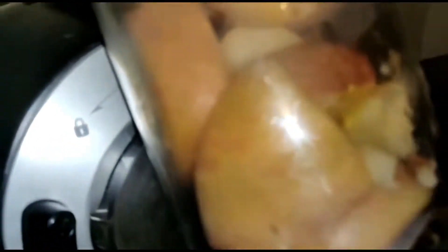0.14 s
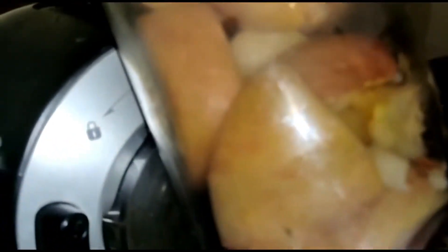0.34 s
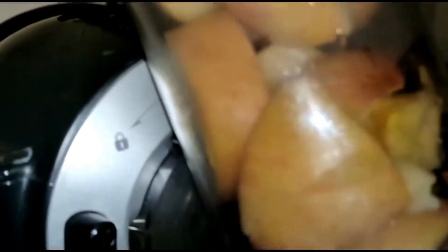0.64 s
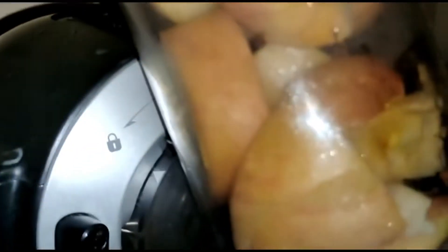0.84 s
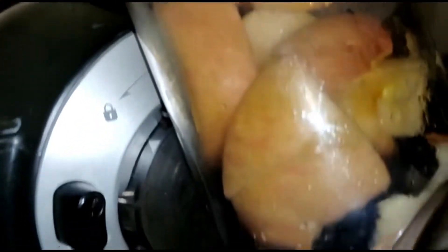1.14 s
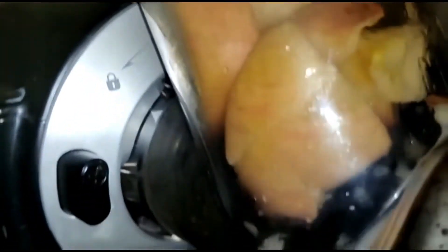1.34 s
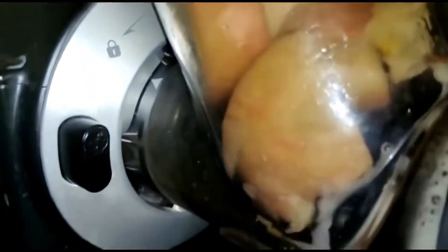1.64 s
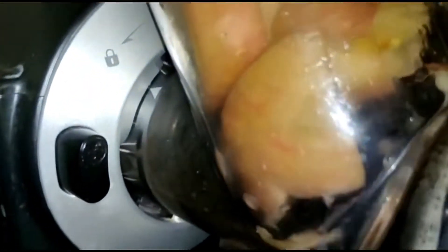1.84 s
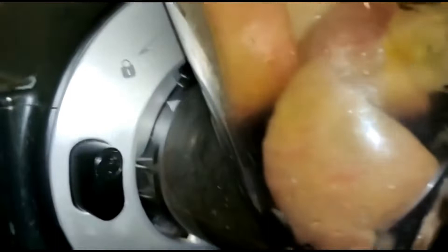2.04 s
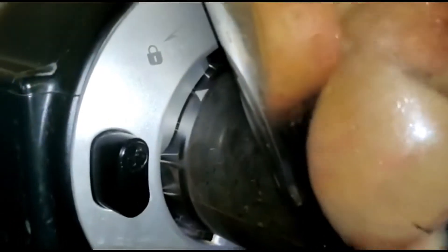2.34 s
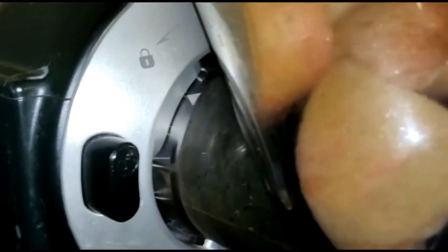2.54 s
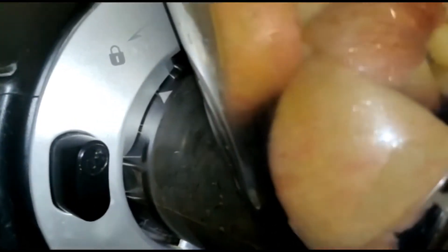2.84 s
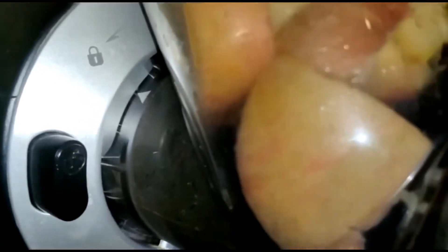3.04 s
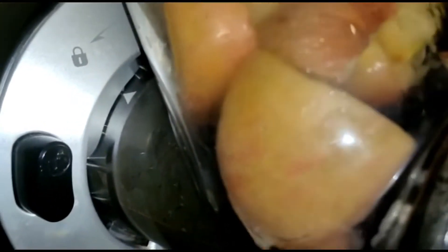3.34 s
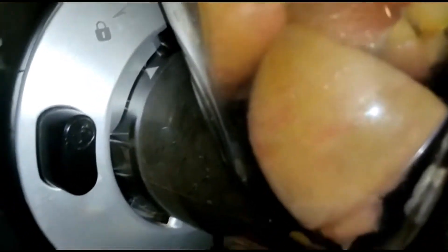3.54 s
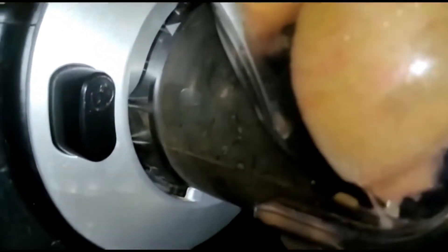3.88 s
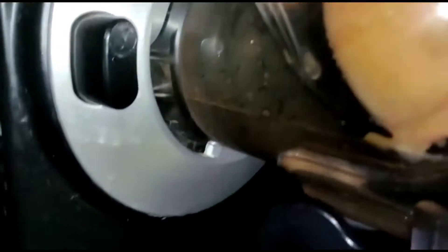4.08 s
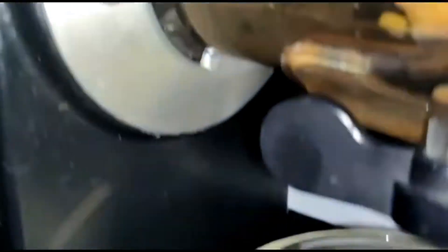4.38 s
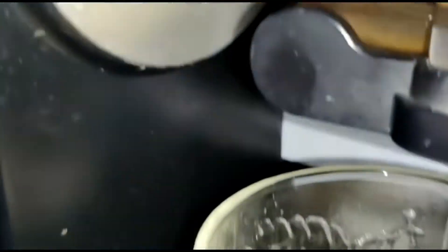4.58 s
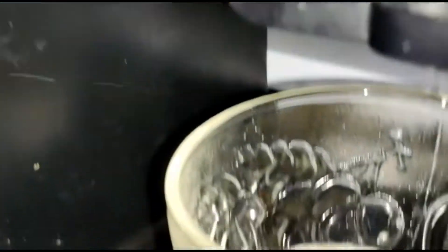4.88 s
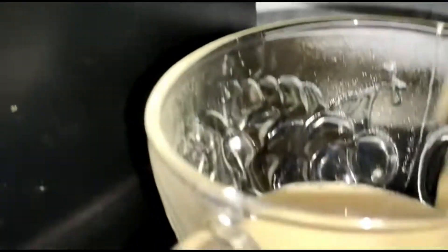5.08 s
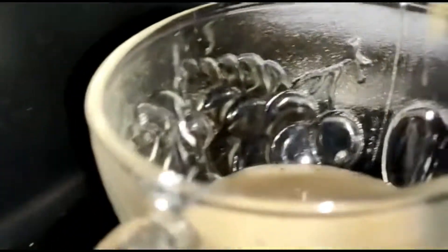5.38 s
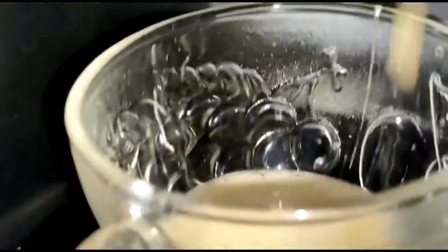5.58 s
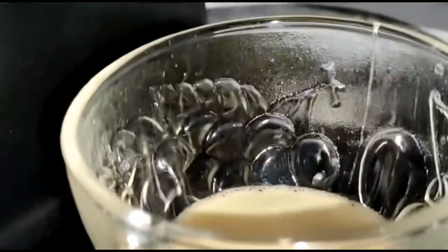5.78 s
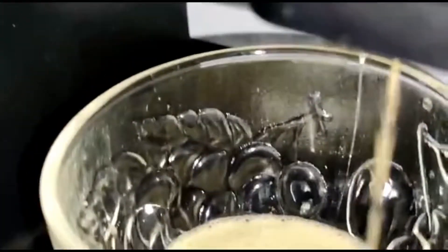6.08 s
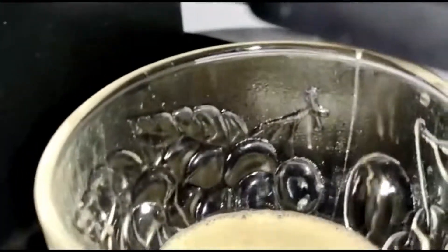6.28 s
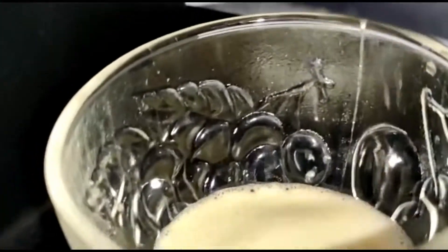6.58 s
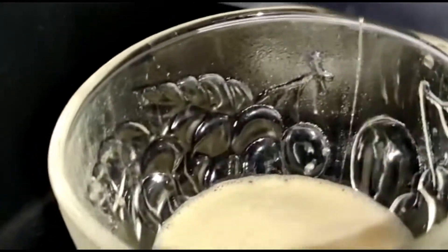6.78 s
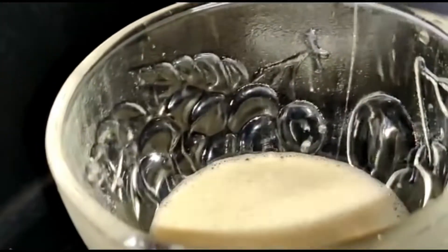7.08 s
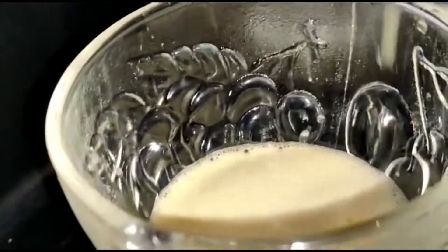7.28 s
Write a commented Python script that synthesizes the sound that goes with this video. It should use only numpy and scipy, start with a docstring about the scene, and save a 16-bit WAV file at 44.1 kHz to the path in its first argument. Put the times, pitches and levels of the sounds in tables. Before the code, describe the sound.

A juicer's electric motor drones with a buzzy hum and noisy gear whirr. First come small knocks and a crisp apple crack, then a low juddering groan with tearing crunch. From two seconds a high, raspy squeak returns once per auger turn, evenly spaced, over a slightly quickening motor. Pulp spits and chirps near the end. Heard very close in stereo by a phone in a kitchen, with short reflections.

```python
"""The turning auger of a slow juicer squeaks on wet pulp about every 0.6 s: friction sounds a gliding set of partials.
Before that an apple piece cracks and another jams, dragged along the wall with a loud groaning crunch (stick-slip).
Behind it the motor, fed with rectified mains, hums and throbs under load and speeds up as the fruit gives way.
Pulp crackles and whistles in the strainer; a hand-held phone hears it all close by on a kitchen counter."""
import sys
import numpy as np
from scipy import signal
from scipy.fft import rfft, irfft
from scipy.io import wavfile
from scipy.ndimage import uniform_filter1d

SR = 44100
rng = np.random.default_rng(int(sys.argv[2]) if len(sys.argv) > 2 else 0)


def unload_wav(signal):
    """Save mono or channel-first audio to the path in sys.argv[1] as 16-bit WAV at rate SR, clipped to [-1, 1]."""
    wavfile.write(
        sys.argv[1],
        SR,
        np.round(np.clip(np.atleast_2d(signal).T, -1, 1) * 32767).astype(np.int16),
    )


N = 327222
T = np.arange(N) / SR
FREQS = np.fft.rfftfreq(N, 1 / SR)

# Levels are those of the sources, ahead of room and microphone.
# motor speed, low under load: [t/s, shaft rate f/Hz]
SHAFT_SPEED = [(0.0, 64.1), (0.25, 64.3), (0.29, 63.4), (0.78, 63.5), (0.99, 65.4), (1.24, 65.9),
               (1.42, 62.5), (1.64, 62.1), (1.75, 65.9), (2.4, 67.6), (2.67, 67.4), (3.45, 69.5),
               (3.64, 70.9), (4.21, 72.0), (5.08, 71.5), (5.39, 72.7), (6.26, 72.5), (7.42, 73.8)]
# shaft rates when labouring, running easily and running free [f/Hz]
LOAD_SPEEDS = [65, 71.7, 72.9]
# motor and gear tones: [multiple of shaft rate, multiple of mains ripple, level/dB labouring, easy, free]
MOTOR_TONES = [(3, 0, -66, -59.5, -56.5), (5, 0, -45, -51.5, -58), (6, 0, -67, -82, -86),
               (7, 0, -51.5, -50.5, -47.5), (8, 0, -92, -45, -39), (9, 0, -46, -48.5, -48),
               (13, 0, -55, -51.5, -58.5), (15, 0, -53.5, -87, -84), (16, 0, -59, -44, -51.5),
               (20, 0, -67, -57, -55.5), (32, 0, -56, -52.5, -45), (40, 0, -100, -57, -58.5),
               (56, 0, -82, -55.5, -57.5), (64, 0, -66, -54.5, -57), (94, 0, -82, -60, -54),
               (96, 0, -60, -58, -80), (128, 0, -97, -62, -55), (160, 0, -88, -70.5, -75),
               (174, 0, -100, -88, -73), (0, 1, -67.5, -80, -69), (0, 2, -50, -49.5, -49.5),
               (0, 3, -50.5, -60.5, -56), (0, 5, -48.5, -59, -60), (0, 7, -59, -52.5, -53.5),
               (1, 1, -55, -56, -80), (3, 1, -49, -53, -50.5), (1, 2, -40.5, -43, -42.5),
               (2, 2, -57.5, -79, -87), (-1, 3, -49, -51, -85), (2, 3, -86, -76, -64),
               (3, 3, -89, -51.5, -63)]
# noise spectrum of gears, brushes and fan: [f/Hz, level/dB per Hz labouring, level/dB per Hz free]
WHIRR_SPECTRUM = [(25, -101, -112), (67, -85.5, -84), (117, -91.5, -92), (170, -77, -72), (292, -72, -68),
                  (440, -70, -63), (592, -64, -63), (666, -72, -71), (820, -70, -69.5), (1550, -71.5, -71),
                  (1700, -74, -88), (2180, -73, -76), (4110, -83, -81.5), (5200, -96.5, -93.5),
                  (5900, -100, -86.5), (6440, -81, -80.5), (7160, -80, -83), (7400, -88.5, -84.5),
                  (11030, -98, -97), (13700, -104.5, -90), (13500, -99, -100)]
# spurts of wet pulp squeezed through the strainer: [t/s, hold/s, relative level/dB]
PULP_SPURTS = [(.23, 0.021, -43), (6.07, 0.11, -34.5), (6.39, 0.043, -37), (6.63, 0.036, -38),
               (7.22, 0.043, -43.5)]
# colour of the pulp's crackle: [f/Hz, relative level/dB]
PULP_SPECTRUM = [(500, -19), (1200, -1.5), (1800, 0.5), (2400, 2.5), (3200, 0.5), (4200, -44), (5200, -8),
                 (6800, -4.5), (9000, -9.5), (15500, -40)]
# juice and air whistling through the strainer, and a second squeal of the auger contact falling near 1.5-1.9
# kHz with its octave near 3-4 kHz (rows at 5.932, 5.955, 6.55, 6.555): [t/s, length/s, first f/Hz, last f/Hz,
# peak level/dB]
WHISTLE_NOTES = [(2.289, 0.063, 2380, 2404, -33.5), (2.91, 0.14, 2480, 2796, -42.5),
                 (5.932, 0.068, 3960, 2990, -39.5), (5.955, 0.061, 1793, 1510, -40.5),
                 (6.05, 0.062, 3610, 3620, -43), (6.057, 0.085, 2750, 2550, -37),
                 (6.107, 0.14, 3205, 2900, -39.5), (6.206, 0.13, 2910, 3420, -47),
                 (6.194, 0.091, 3750, 4430, -44), (6.37, 0.12, 2610, 3080, -41.5),
                 (6.385, 0.097, 3570, 4460, -42.5), (6.55, 0.061, 3765, 3140, -37.5),
                 (6.555, 0.056, 1852, 1534, -37), (6.591, .055, 3180, 3960, -41),
                 (6.644, 0.05, 3725, 3270, -40), (7.217, 0.06, 2690, 3400, -44.5)]
# fruit snapping, knocking and popping in the chute: [t/s, level/dB, ring f/Hz, decay/s]
CRACK_EVENTS = [(0.626, -29, 1560, 0.0045), (.638, -22, 440, 0.0043), (.639, -20, 1200, 0.0021),
                (.786, -29, 2080, 0.004), (0.802, -15.5, 1276, 0.0095), (0.801, -19.5, 2506, 0.0071),
                (0.803, -30.5, 6660, .011), (1.452, -24, 6940, .004), (1.485, -29, 2250, .003),
                (1.497, -30, 6850, 0.0065), (1.506, -27, 3030, .003), (1.519, -20, 1350, 0.0041),
                (1.603, -24, 2300, 0.0041), (1.613, -31, 6830, .007), (2.08, -28, 931, 0.0053),
                (2.448, -32, 1420, .005), (2.781, -27, 950, .005), (2.867, -22.5, 1290, .005),
                (2.89, -32, 835, 0.009), (3.299, -29, 1130, 0.0055), (3.331, -28, 1160, 0.0087),
                (3.899, -29, 1136, 0.0036), (4.419, -27.5, 1120, 0.0052), (5.183, -24.5, 1432, .005),
                (6.061, -24, 1487, 0.0059)]
# a piece softly rubbing on the wall: [t/s, hold/s, level/dB]
RUB_CONTACTS = [(.21, 0.061, -32), (.82, 0.033, -38.5), (1.82, 0.34, -37.5), (2.86, .06, -43)]
# shoves of the jammed piece: [t/s, hold/s, level/dB of first partial, second, higher overtones, tearing flesh]
GROAN_SHOVES = [(1.416, .04, -11, -28, -32.5, -24.5), (1.466, 0.061, -11.5, -34, -32, -22),
                (1.563, .03, -17, -26.5, -49, -24.5), (1.601, 0.031, -11.5, -30.5, -46, -23),
                (1.659, 0.021, -15.5, -26.5, -39, -29.5), (1.708, 0.009, -22.5, -42, -52, -37)]
# the groan's higher overtones: [multiple of its pitch, relative level/dB]
GROAN_OVERTONES = [(3, 2), (4, -3), (5, -9), (6, -10)]
# colour of the crunch: [f/Hz, relative level/dB]
CRUNCH_SPECTRUM = [(150, -38), (400, -8), (650, -0.5), (1100, -0.5), (1400, -3.5), (2000, 3.5), (3500, -3),
                   (4400, -12), (5700, -11.5), (6300, -10), (6850, -3.5), (7400, -16.5), (10000, -22.5),
                   (13000, -38), (15500, -27)]
# one squeak per turn of the auger: [pinch t/s, lead-in/s, slide/s, chatter/s,
# relative level/dB, shrillness/dB, extra dip f/Hz, extra climb f/Hz]
SQUEAK_TURNS = [(2.116, 0.0056, .14, 0.13, -4.5, 1.5, 8.5, 50),
                (2.78, 0.015, .1, .15, -7.5, 4.5, -130, -120),
                (3.417, 0.016, 0.23, .025, -2, 1, -30, -29.5), (4.038, 0.046, .141, .12, 0, 0, -110, -2.5),
                (4.678, 0.074, 0.11, 0.11, -1, 1.5, -59.5, 79),
                (5.297, 0.064, 0.095, 0.13, 1, 1.5, -38, 18.5),
                (5.907, .075, .125, 0.1, 0.5, 4, 1.5, 400.5), (6.511, 0.084, 0.12, 0.093, 0.5, 4, 25.5, 3),
                (7.13, .088, .115, .085, 2, 3.5, 60, 329.5)]
# the course of every squeak: pitch sinks and turns shrill as the pulp is pinched, climbs as it slides free,
# then the contact breaks and chatters:
# [t/s into the squeak, pitch f/Hz, fundamental level/dB, shrill-partial control level/dB, roughness 0-1]
SQUEAK_COURSE = [(0, 2285, -37, -35.5, 0.05), (.02, 2148, -45, -30.5, .06), (.042, 2238, -36.5, -38, .12),
                 (.07, 1941, -38.5, -28, 0.16), (0.097, 2197, -32.5, -38, .03),
                 (.135, 2337, -32, -39.5, 0.02), (.185, 2448, -33, -43.5, .08), (.197, 2394, -38, -37, .5),
                 (.21, 2192, -38, -38, 0.91), (.26, 2206, -43, -36.5, 0.8), (.29, 2426, -34, -40, .2)]
# the bowl's response to a squeak: [f/Hz, relative level/dB]
BOWL_RESPONSE = [(2400, 0), (4500, -2), (5300, -7), (6100, 0), (6700, 3), (7300, -2), (8000, -5),
                 (8600, -10), (12000, -7)]

RIPPLE_HZ, TOP_HZ = 120, 15850  # rectified mains ripple; the phone's upper limit
PULP_ATTACK_S, PULP_RELEASE_S, SEEP_DB = 0.089, 0.24, -51  # between spurts the pulp only seeps
RUB_ATTACK_S, RUB_RELEASE_S = 0.11, 0.06
# light contact between the rubs, until the fruit has gone down
CONTACT_DB, CONTACT_END_S, CONTACT_RELEASE_S = -46.5, 2.93, 0.29
GROAN_HZ, GROAN_ATTACK_S, GROAN_RELEASE_S = 564, 0.022, 0.033
TEAR_ATTACK_S, TEAR_RELEASE_S = 0.017, 0.041
PINCH_S, FREE_S, BEND_S = .07, .185, 0.032  # tightest and freest moments of the course; width of extra bends
EDGE_HZ, EDGE_DB_PER_HZ = 2220, 3  # above this pitch a squeak loses its edge
LEAD_S = .07  # a longer lead-in slows the opening of the squeak; a shorter one joins it late


def undb(db):
    """Definition of the decibel: level to amplitude gain."""
    return 10 ** (np.asarray(db) / 20)


def unit(x):
    """Normalisation: scale to rms 1."""
    return x / np.sqrt(np.mean(x ** 2))


def turn(hz):
    """Phase is the running integral of frequency."""
    return 2 * np.pi * np.cumsum(hz) / SR


def walk(rate):
    """Low-passed Gaussian noise: smooth chance of rms 1 that changes about rate times a second."""
    size = N // 27  # a coarse time grid suffices
    lowpass = 1 + (2 * FREQS[:size // 2 + 1] / rate) ** 4
    slow = irfft(rfft(rng.standard_normal(size)) / lowpass, size)
    return unit(np.interp(T, np.linspace(0, T[-1], size), slow))


def colour(x, points):
    """Linear filtering: multiply the spectrum by a curve through [f/Hz, level/dB] points."""
    hz, db = np.transpose(points)
    gain = undb(np.interp(np.log(FREQS + 1), np.log(hz), db))
    return irfft(rfft(x) * gain, N)


def gate(start, end, fade):
    """Amplitude window: 1 from start to end, fading on both sides."""
    return np.clip(np.minimum(T - start, end - T) / fade + 1, 0, 1) ** 2


def swell(start, hold, db, attack, release):
    """Exponential growth and decay around a hold at the given level."""
    before = np.minimum(T - start, 0)
    after = np.maximum(T - start - hold, 0)
    return undb(db) * np.exp(before / attack - after / release)


def swells(rows, attack, release):
    """Dominance: the strongest of several swells at each moment."""
    return np.max([swell(s, hold, db, attack, release) for s, hold, db in rows], axis=0)


def grains(rate, spread_db):
    """Random impulse process: bursting fruit cells as clicks of uneven size."""
    size = undb(spread_db * np.minimum(rng.exponential(size=N), 4))
    return unit((rng.random(N) < rate / SR) * size * rng.standard_normal(N))


def kitchen(x, direct, t60, wet_db, low_wet_db):
    """Reverberation: short reflections from counter and walls, unrelated left and right in the treble."""
    t = T[:SR // 2]
    treble = 1 / (1 + (850 / (FREQS + 1)) ** 6)
    decay = undb(-60 * t / t60) * (t > .002)
    tails = rfft(rng.standard_normal((2, len(t))) * decay, N)
    # level the broad peaks and dips of the random tails, leaving an evenly coloured room
    tails /= np.sqrt(uniform_filter1d(abs(tails) ** 2, size=N // 150))
    wet = treble * undb(wet_db)
    # in the bass the reflections only widen the sound a little
    width = np.array([[1], [-1]]) * tails[0] * (1 - treble) * undb(low_wet_db)
    return irfft(rfft(x) * ((direct + wet * tails) / np.sqrt(1 + wet ** 2) + width), N)


def ports(lag_ms, bass_share):
    """Arrival-time difference: sound reaches the left of two microphone ports later, less so in the bass."""
    share = np.interp(FREQS, [600, 1200], [bass_share, 1])
    left = np.exp(-2j * np.pi * FREQS * share * lag_ms / 1000)
    return np.array([left, np.ones(len(FREQS))])


def motor(speed):
    """Harmonic and sideband synthesis: shaft harmonics and their sums with the mains ripple, beating under load."""
    shaft, shake, out = turn(speed), .007 * walk(30), 0
    ripple_phase = 2 * np.pi * RIPPLE_HZ * T
    for order, ripple, *levels in MOTOR_TONES:
        flutter_db = (.8 if order < 10 else 1.8) * walk(25)
        db = np.interp(speed, LOAD_SPEEDS, levels) + flutter_db
        out = out + undb(db) * np.cos(order * (shaft + shake) + ripple * ripple_phase)
    return np.sqrt(2) * out


def whirr(speed):
    """Cyclic and modulated noise: brush noise repeats every shaft turn, a hiss pulses with ripple and shaft."""
    table, shaft = np.array(WHIRR_SPECTRUM), turn(speed)
    free = np.clip((speed - LOAD_SPEEDS[0]) / (LOAD_SPEEDS[2] - LOAD_SPEEDS[0]), 0, 1) ** 2
    # the brushes pass over the same bumps on every turn
    bumps = signal.resample(rng.standard_normal(560), 8192)
    angles = np.linspace(0, 2 * np.pi, len(bumps))
    brushes = unit(np.interp(shaft % (2 * np.pi), angles, bumps))
    brushes = colour(brushes, [(700, -18), (1500, -11), (4000, -9), (8000, -5)])
    pulse = 1 + 0.21 * np.cos(2 * np.pi * RIPPLE_HZ * T) + 0.01 * np.cos(shaft) + 0.17 * np.cos(2 * shaft)
    hiss = unit(rng.standard_normal(N) * pulse * undb(.5 * walk(28.0)))
    noise = (.92 * hiss + brushes) * np.sqrt(SR / 2)  # rms to density per Hz
    return (1 - free) * colour(noise, table[:, [0, 1]]) + free * colour(noise, table[:, [0, 2]])


def chirps(count, low_hz, high_hz, length, glide):
    """Short gliding tones: air and juice forced through the mesh, most of them rising."""
    out, t = np.zeros(N + SR), np.arange(int(length * SR)) / SR
    for when, pitch, slope in rng.random((count, 3)):
        hz = (low_hz + pitch * (high_hz - low_hz)) * (1 + glide * (slope - .4) * t / length)
        start = int(when * N)
        out[start:start + len(t)] += np.hanning(len(t)) * np.sin(turn(hz))
    return unit(out[:N])


def pulp():
    """Granular noise: wet crackle in uneven spurts; the mesh chirps only when the pulp is pressed hard."""
    spurts = swells(PULP_SPURTS, PULP_ATTACK_S, PULP_RELEASE_S)
    db = 20 * np.log10(np.hypot(undb(SEEP_DB), spurts))
    crackle = unit(colour(grains(rate=1500, spread_db=2.1), PULP_SPECTRUM))
    spray = chirps(count=600, low_hz=2300, high_hz=4200, length=.035, glide=.3) * undb(4 * walk(300) - 2)
    pressed = np.clip((db + 50) / 10, 0, 1)
    return (crackle + .8 * pressed * spray) * undb(db - 1.5 + 1.2 * walk(35))


def whistles():
    """Frequency and amplitude modulation: sliding, sputtering notes from the strainer, and a second squeal
    falling in pitch."""
    out, wobble, sputter = np.zeros(N), .014 * walk(250), undb(3.5 * walk(140))
    for s, length, first_hz, last_hz, db in WHISTLE_NOTES:
        span = (T > s) & (T < s + length)
        hz = np.geomspace(first_hz, last_hz, span.sum()) * (1 + wobble[span])
        envelope = undb(db) * signal.windows.tukey(len(hz), .5)
        out[span] += envelope * sputter[span] * np.sin(turn(hz))
    return out


def cracks():
    """Impulsive excitation of a damped mode: each snap is a click shower and one dying ring of the chute."""
    out, t = np.zeros(N), T[:SR // 10]
    clicks = grains(rate=6000, spread_db=1.2)
    for s, db, hz, decay in CRACK_EVENTS:
        span = slice(int(s * SR), int(s * SR) + len(t))
        band = signal.butter(3, [.55 * hz, 1.3 * hz], "band", fs=SR, output="sos")
        shower = 0.5 * unit(signal.sosfilt(band, clicks[span])) * np.exp(-t / 0.0061)
        onset = np.minimum(t * hz, 1)  # rises over one period
        ring = np.sin(2 * np.pi * hz * t) * onset * np.exp(-t / decay)
        out[span] += undb(db) * (ring + shower)
    return out


def rub():
    """Friction-driven resonance: lightly rubbed, the wall sings with an unsteady pitch."""
    contact = swell(0, CONTACT_END_S, CONTACT_DB, RUB_ATTACK_S, CONTACT_RELEASE_S)
    pressure = np.hypot(contact, swells(RUB_CONTACTS, RUB_ATTACK_S, RUB_RELEASE_S))
    return np.sqrt(2) * pressure * undb(2.9 * walk(60)) * np.sin(turn(570 + 11 * walk(38.9)))


def groan():
    """Stick-slip: a jammed piece judders on the wall's resonance, tearing cells at each slip; tone and crunch."""
    shoves = np.array(GROAN_SHOVES)
    first, second, higher = (swells(shoves[:, [0, 1, column]], GROAN_ATTACK_S, GROAN_RELEASE_S)
                             for column in (2, 3, 4))
    tear = swells(shoves[:, [0, 1, -1]], TEAR_ATTACK_S, TEAR_RELEASE_S)
    phase = turn(GROAN_HZ * (1 + 0.01 * walk(237)))
    overtones = sum(undb(db + 3.2 * walk(130)) * np.sin(k * (phase + .09 * walk(220)))
                    for k, db in GROAN_OVERTONES)
    tone = first * undb(.5 * walk(90)) * np.sin(phase)
    tone = tone + second * undb(2 * walk(110)) * np.sin(2 * phase) + higher * overtones
    slips = ((1 + np.cos(phase)) / 2) ** 5 + .12  # one burst per period
    tearing = grains(rate=9000, spread_db=1) * slips * undb(3 * walk(320))
    return np.sqrt(2) * tone, tear * unit(colour(tearing, CRUNCH_SPECTRUM))


def auger():
    """Cyclic control: every turn replays the squeak's course; gives pitch, two levels, roughness and gate."""
    course, *columns = np.transpose(SQUEAK_COURSE)
    controls, on = np.zeros((4, N)), np.zeros(N)
    for s, lead, slide, chatter, db, shrill_db, dip_hz, climb_hz in SQUEAK_TURNS:
        since = T[T > s - 2 * LEAD_S] - s
        moments = [-max(lead, LEAD_S), 0, slide, slide + chatter]
        age = np.interp(since, moments, [0, PINCH_S, FREE_S, course[-1]])
        hz, first_db, third_db, rough = (np.interp(age, course, c) for c in columns)
        pinched, free = (np.exp(-abs(age - at) / BEND_S) for at in (PINCH_S, FREE_S))
        hz = hz - dip_hz * pinched + climb_hz * free
        controls[:, N - len(age):] = hz, first_db + db, third_db + db + shrill_db, rough
        on += gate(s - lead, s + slide + chatter, fade=.012)
    return *controls, on


def squeaks(wander):
    """Friction oscillation: pulp squeals on the auger; chatter scatters the pitch and adds half-way partials."""
    hz, first_db, third_db, rough, on = auger()
    scatter = rough * (.05 * walk(452) + .05 * walk(70))
    phase = turn(hz * (1 + wander * walk(25) + 0.004 * walk(98) + scatter))
    between_db = (first_db + third_db) / 2
    # the highest partials come out only while the pitch is pressed down
    edge_db = third_db - EDGE_DB_PER_HZ * np.maximum(hz - EDGE_HZ, 0)
    partials = [first_db, between_db - 8, third_db - 5.5, edge_db - 12, edge_db - 22]
    tone = 0
    # grit in the contact makes the upper partials flutter and blurs their pitch
    for k, db in enumerate(partials):
        level = undb(db + (3 if k else 1.5) * walk(140))
        tone = tone + level * np.sin((k + 1) * (phase + .12 * walk(180)))
    halves = np.sin(3 * phase / 2) + np.sin(5 * phase / 2)
    tone = tone + np.sqrt(np.clip(rough, 0, 1)) * undb(first_db - 16 + 3 * walk(30)) * halves
    return np.sqrt(2) * colour(on * tone, BOWL_RESPONSE)


def scene():
    """Superposition: tones reach both ports almost in step, noises fill the kitchen; whirr shifts as phone moves."""
    speed = np.interp(T, *np.transpose(SHAFT_SPEED))
    judder, crunch = groan()
    hum = rfft(motor(speed) + judder + rub())
    tones = irfft(hum * np.exp(-1j * np.array([[.38], [0]])), N)  # left lags by 0.38 rad
    direct = ports(lag_ms=0.25, bass_share=0.2)
    # three sets of reflections trade places at constant total power
    shares = np.array([walk(3) for _ in range(3)])
    housing = sum(share * kitchen(whirr(speed), direct, t60=0.044, wet_db=7.5, low_wet_db=-11.5)
                  for share in shares / np.linalg.norm(shares, axis=0))
    # a weaker second spot of contact squeals along, wandering off pitch
    squeal = squeaks(wander=0) + .2 * squeaks(wander=.035)
    strainer = kitchen(squeal + whistles() + pulp(), direct, t60=0.085, wet_db=7.5, low_wet_db=-29)
    # the fruit breaks right under the phone, so it is heard drier
    wall = kitchen(crunch, direct, t60=.05, wet_db=5, low_wet_db=-25)
    chute = kitchen(cracks(), direct, t60=.025, wet_db=0, low_wet_db=-25)
    return tones + housing + strainer + wall + chute


def record(dry):
    """Microphone response: the left port is duller at the very top; a low-pass cuts off the highest treble."""
    left = colour(dry[0], [(1000, -1.0), (2500, 0.0), (6000, 2.5), (9000, 4.0), (13000, 5.5)])
    right = colour(dry[1], [(1000, -0.5), (2500, -3.0), (6000, 1.5), (9000, 3.5), (13000, 11.0)])
    lowpass = signal.ellip(10, .2, 80, TOP_HZ, fs=SR, output="sos")
    return signal.sosfilt(lowpass, [left, right])


dry = scene()
out = record(dry)
unload_wav(out)
```